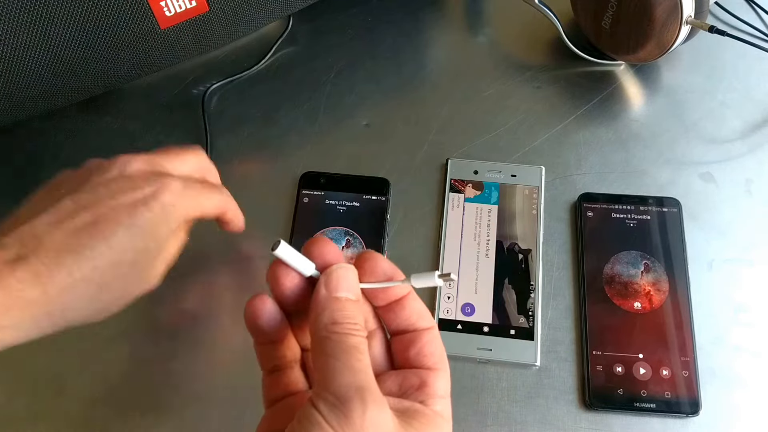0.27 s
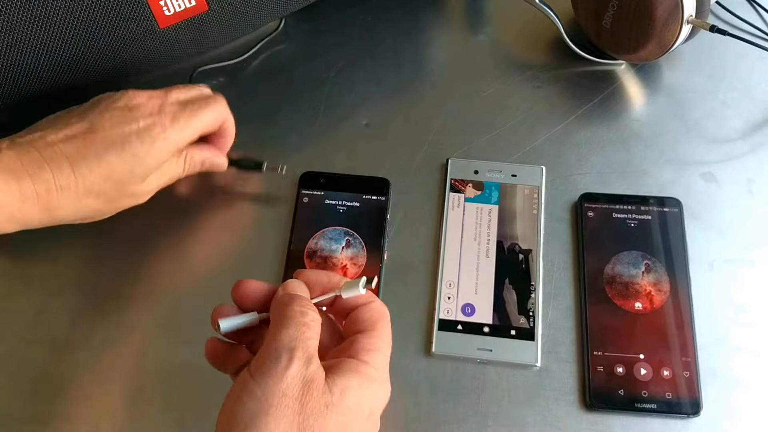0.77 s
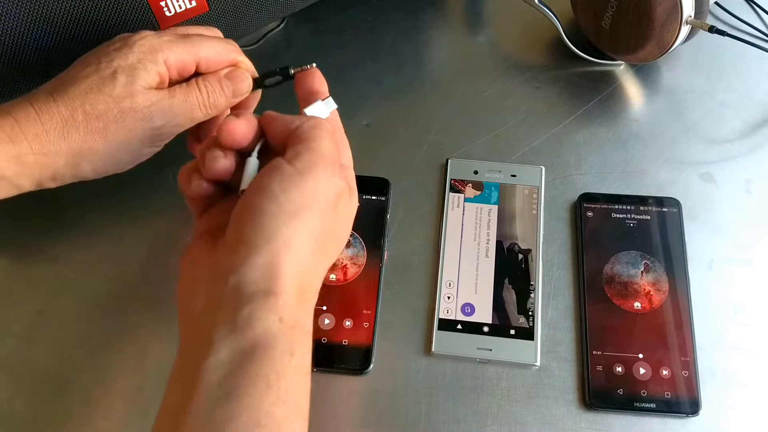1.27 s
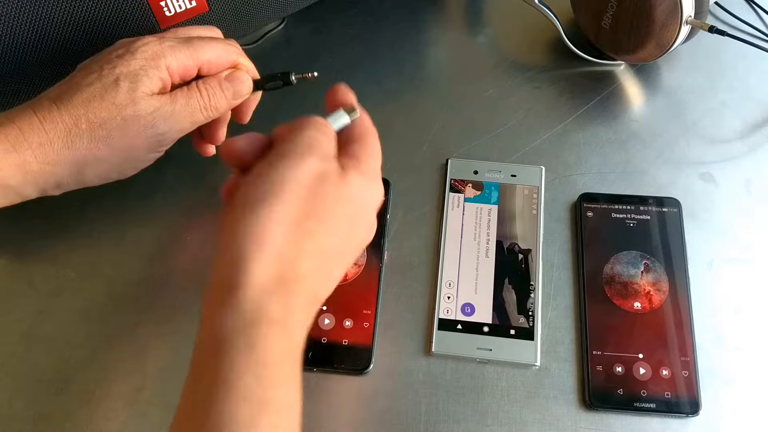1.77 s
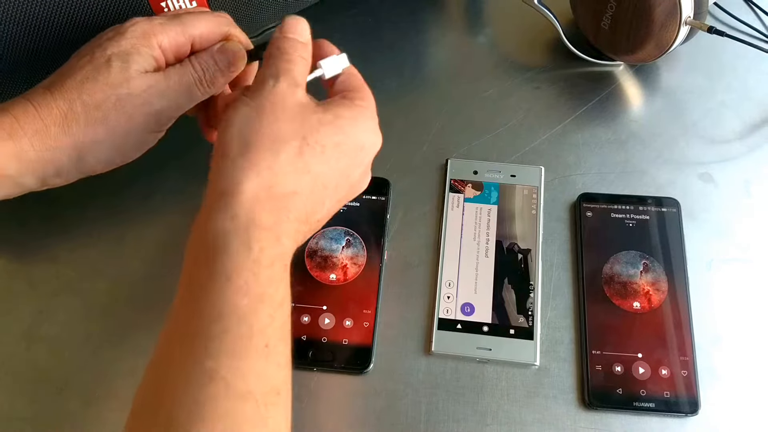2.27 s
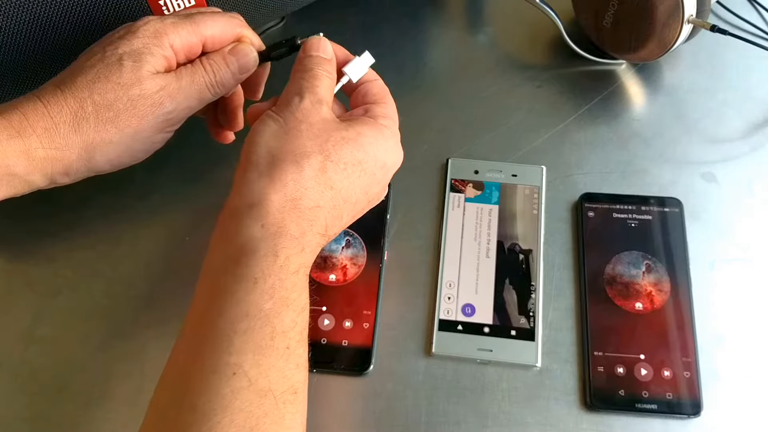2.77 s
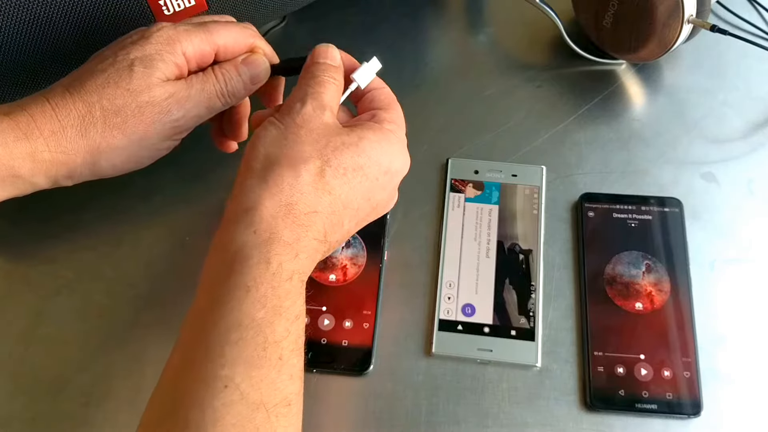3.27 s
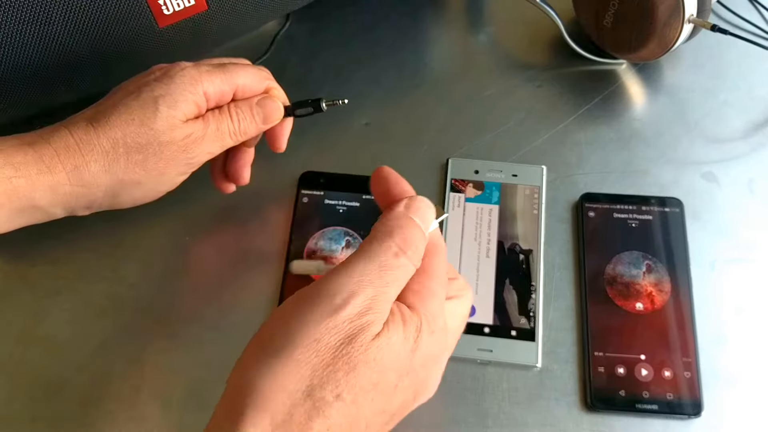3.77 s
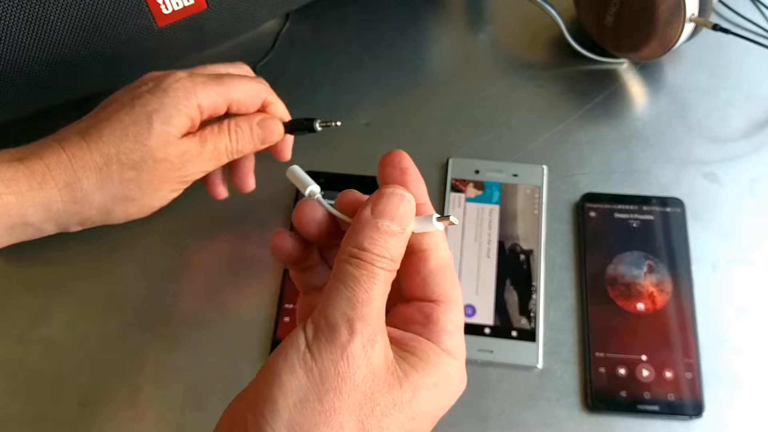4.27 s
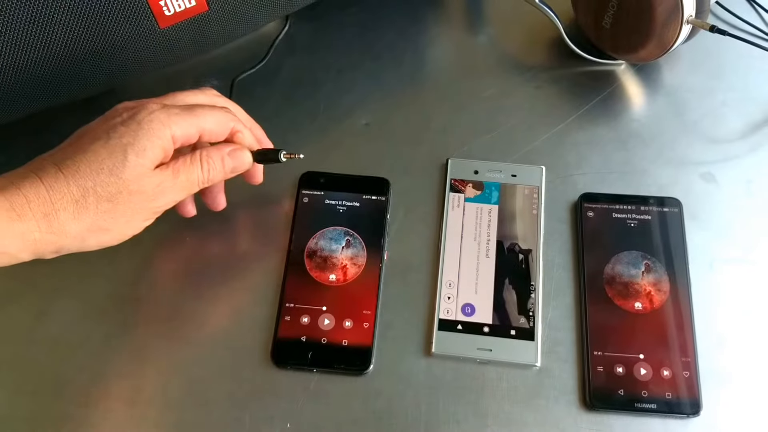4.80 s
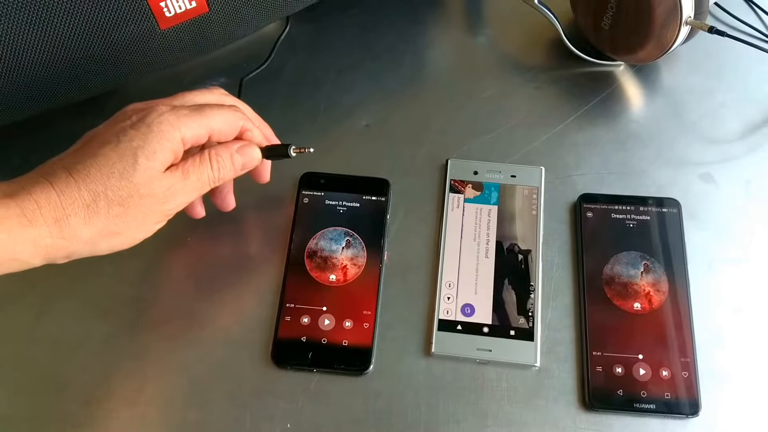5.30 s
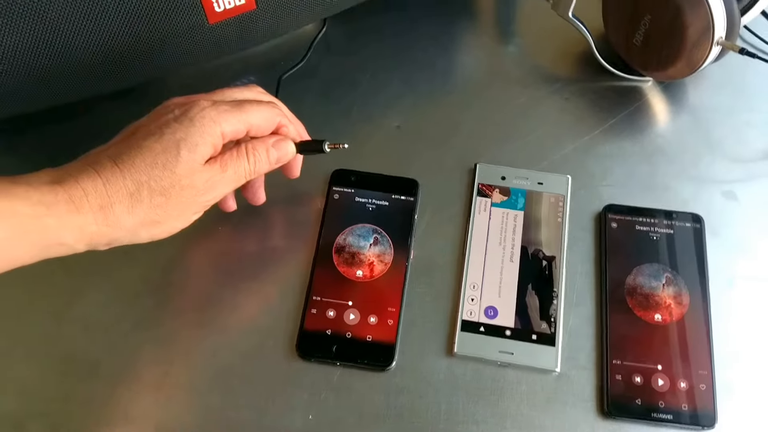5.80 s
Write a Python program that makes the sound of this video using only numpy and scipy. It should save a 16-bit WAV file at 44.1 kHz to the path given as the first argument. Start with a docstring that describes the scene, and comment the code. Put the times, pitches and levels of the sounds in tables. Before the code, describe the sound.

A plug snaps out of a phone, then a loudspeaker pops, buzzes and booms as the live plug is touched, followed by light clicks.

```python
"""A loudspeaker on a table pops, buzzes and booms as its live jack plug is tried in a small adapter.
First the plug scrapes and snaps out of a phone. Then the speaker pops as the plug makes contact, and
while the tip is touched, mains hum makes it buzz and sizzle, with a bass boom that rings on.
Last, the adapter is put down with a few light clicks and a faint metallic ring.
Two close microphones hear it all in a small room with a low rumble."""
import sys
import numpy as np
from scipy import signal
from scipy.fft import rfft, irfft, next_fast_len
from scipy.io import wavfile
from scipy.ndimage import uniform_filter1d

SR = 44100
rng = np.random.default_rng(int(sys.argv[2]) if len(sys.argv) > 2 else 0)


def unload_wav(signal):
    """Save mono or channel-first audio to the path in sys.argv[1] as 16-bit WAV at rate SR, clipped to [-1, 1]."""
    wavfile.write(
        sys.argv[1],
        SR,
        np.round(np.clip(np.atleast_2d(signal).T, -1, 1) * 32767).astype(np.int16),
    )


N = 266540
T = np.arange(N) / SR
BINS = np.fft.rfftfreq(8192, 1 / SR)  # the frequencies at which filters are drawn [Hz]
MAINS_HZ, MAINS_PHASE_S = 50.03, .0121


def amp(db):
    """Turns decibels into a gain."""
    return 10 ** (np.asarray(db) / 20)


def unit(x):
    """Scales a sound to an average (rms) level of 1."""
    return x / np.sqrt(np.mean(x ** 2) + 1e-20)


def read(points, hz=BINS):
    """Joins a table's points into a curve over log frequency."""
    f, value = np.transpose(points)
    return np.interp(np.log(hz + 1), np.log(f + 1), value)


def add(mix, start_s, sound):
    """Mixes a sound in at the given time."""
    part = mix[:, max(round(start_s * SR), 0):][:, :sound.shape[1]]
    part += sound[:, :part.shape[1]]


def sides(db):
    """Left and right gains; positive dB leans left."""
    return amp(np.array([[1], [-1]]) * db / 2)


def placed(sound, pan_db, room_db):
    """Sets the side of a sound and how much of it reaches the room."""
    return sound * np.vstack([sides(pan_db), [[amp(room_db)]]])


def colour(x, db):
    """Filters by a dB curve at BINS; nothing rings before the sound starts."""
    log_gain = np.log(amp(np.concatenate([db, db[-2:0:-1]])))
    taps = np.fft.ifft(np.exp(np.conj(signal.hilbert(log_gain)))).real[:len(BINS)]
    return signal.oaconvolve(np.atleast_2d(x), taps[None], axes=1)[:, :x.shape[-1]]


def shape(x, gain):
    """Filters by a gain curve at BINS; only a complex gain shifts the phase."""
    size = next_fast_len(N)
    hz = np.fft.rfftfreq(size, 1 / SR)
    curves = np.array([np.interp(hz, BINS, g) for g in np.atleast_2d(gain)])
    return irfft(rfft(x, size) * curves, size)[:, :N]


def resonate(x, hz, width_hz):
    """Two like resonances in a row: the narrower, the longer they ring."""
    r = np.exp(-np.pi * width_hz / SR)
    for _ in range(2):
        x = 2 * signal.lfilter([1 - r], [1, -r * np.exp(2j * np.pi * hz / SR)], x + 1e-18).real
    return x


def crack(db, scatter, decay_s, rise_s, scatter_hz=1000):
    """A click whose treble partly scatters into a spray of noise. Rows: left, right, into the room."""
    t = T[:len(BINS)]
    click = 1. * (t == 0)
    spray = rng.standard_normal((2, len(t))) * np.exp(-t / decay_s) * (1 - np.exp(-t / rise_s))
    spray /= np.linalg.norm(spray, axis=1, keepdims=True)
    share = scatter / (1 + (scatter_hz / (BINS + 10)) ** 2)
    direct = colour(click, db + 10 * np.log10(1 - share)) + colour(spray, db + 10 * np.log10(share))
    # summed over all directions, the treble peaks even out
    all_round = db + (uniform_filter1d(db, size=300) - db) * BINS ** 4 / (BINS ** 4 + 2000 ** 4)
    return np.vstack([direct, colour(click, all_round)])


def pickup_db(rise_db=26, fade_db_per_s=4, start_s=1.7, rise_s=0.36):
    """Hum on the bare plug swells to 0 dB as it is held to the adapter, then slowly fades."""
    since = T - start_s
    return rise_db * (np.clip(since / rise_s, 0, 1) - 1) - fade_db_per_s * np.maximum(since - rise_s, 0)


# tone of the rumble and hiss: (frequency [Hz], relative level [dB])
NOISE_TONE = [(15, -53), (25, -22.5), (38, -4), (59, -7), (157, -23), (301, -23), (405, -28.5),
              (503, -28.5), (1230, -34.5), (1330, -36.5), (1560, -37.5), (5880, -49), (13600, -42),
              (16000, -49)]
# how alike that noise is in both microphones: (frequency [Hz], likeness [0 to 1])
NOISE_LIKENESS = [(50, 0.5), (200, 0.47), (600, 0.37), (1500, 0), (15000, 0)]
# which way the background leans: (frequency [Hz], left minus right [dB])
BACKGROUND_PAN = [(55, -7.5), (120, -8), (250, 0), (15000, -0.5)]
# low tones that hang in the room: (frequency [Hz], relative level [dB])
LOW_TONES = [(48.4, -54), (70.0, -62), (102.3, -65), (150.7, -68.5), (199.2, -68.5), (247.6, -69.5)]
def background(noise_db=-54.5, hum_db=-1, waver=0.13, waver_hz=3):
    """Room rumble and microphone hiss, plus low wavering tones that weakly follow the plug's hum."""
    left, other = rng.standard_normal((2, N))
    same, balance = read(NOISE_LIKENESS), sides(read(BACKGROUND_PAN))
    right = shape(left, same) + shape(other, np.sqrt(1 - same ** 2))
    hiss = amp(noise_db) * unit(shape(np.vstack([left, right]), amp(read(NOISE_TONE)) * balance))
    hum = np.zeros(N)
    for hz, db in LOW_TONES:
        drift = unit(resonate(rng.standard_normal(N), hz, waver_hz))
        hum += amp(db) * (np.sqrt(2) * np.sin(2 * np.pi * hz * T) + waver * drift)
    swell = amp(hum_db + pickup_db(rise_db=18, fade_db_per_s=0.64))
    return hiss + shape(hum * swell, balance)


# tone of the plug sliding in the socket: (frequency [Hz], relative level [dB])
SLIDE_TONE = [(60, -18), (400, 12), (1000, -5), (2200, -5), (3300, -3.5), (5000, 1), (9000, 1.5),
              (12500, -1), (16000, -13)]
# tone of the plug snapping free: (frequency [Hz], relative level [dB])
SNAP_TONE = [(40, -23), (90, 5), (180, 17), (400, 11), (720, 2), (1400, 0), (2400, -4), (2850, 0),
             (3300, -10.5), (5000, -8), (8000, -6.5), (11600, -2.5), (16000, -20)]
def unplug(snap_s=.0642, snap_db=7, slide_db=-52):
    """The plug scrapes out of the phone's socket and comes free with a snap."""
    out = np.zeros((3, N))
    scrape = colour(rng.standard_normal((3, N))[:, :round(snap_s * SR)], read(SLIDE_TONE))
    add(out, 0, amp(slide_db) * unit(scrape))
    snap = crack(snap_db + read(SNAP_TONE), scatter=0.63, decay_s=0.0013, rise_s=0.0018)
    add(out, snap_s, placed(snap, pan_db=4.3, room_db=1))
    return out


# taps on plug and adapter:
# (time [s], relative level [dB], pitch [Hz], width [octaves], decay [s], left minus right [dB])
TAPS = [(.401, -24.5, 7900, 1, 0.0013, 0), (.402, -3, 144, 1.08, 0.02, -2.5),
        (0.41, -29, 5500, 5.7, 0.0064, 4), (0.606, -20, 1900, 0.9, 0.0078, -2),
        (0.647, -16, 334, 0.58, 0.0026, -1), (4.97, -6, 156, 0.66, 0.015, 0),
        (4.9798, -14, 3600, 0.82, 0.0033, -11), (5.0002, -19, 3540, 0.71, 0.0018, -23),
        (5.004, -21.5, 2900, 1.09, 0.004, 15), (5.174, -20.5, 4000, 0.55, 0.0014, -8),
        (5.286, -29.5, 1820, 0.73, 0.012, 0), (5.557, -23.5, 1910, 0.62, 0.012, -3)]
# resonances of their small parts: (frequency [Hz], width [Hz], boost [dB])
PART_RESONANCES = [(930, 970, 15.5), (3030, 92, 9.5), (4060, 470, 7), (7600, 230, 11)]
def taps(skirt_db=-26, room_db=-1):
    """Handled plastic and metal parts click and scrape, and die away at once."""
    out = np.zeros((3, N))
    body_db = sum(db / (1 + (2 * (BINS - hz) / width) ** 2) for hz, width, db in PART_RESONANCES)
    for start_s, db, hz, octaves, decay_s, pan_db in TAPS:
        band = np.exp(-.5 * (np.log2((BINS + 1) / hz) / octaves) ** 2)
        skirt = amp(skirt_db) / (1 + BINS / hz)  # weak sound outside the band
        tone_db = db + body_db + 20 * np.log10(band + skirt)
        tap = crack(tone_db, scatter=.99, decay_s=decay_s, rise_s=0.00041, scatter_hz=208)
        add(out, start_s, placed(tap, pan_db, room_db))
    return out


def whine(start_s=1.1, end_s=1.6, fade_s=.06, hz=1210, width_hz=70, level_db=-74):
    """A narrow band of noise makes a faint, fuzzy tone in the background."""
    gate = np.clip(np.minimum(T - start_s, end_s - T) / fade_s, 0, 1)
    return amp(level_db) * gate * unit(resonate(rng.standard_normal((2, N)), hz, width_hz))


# touches of the plug's tip: (time [s], length [s], buzz [dB], sizzle [dB], bass drive [dB],
# delay to firmest contact [s], half-length of the dip there [s], depth of the dip [dB])
TIP_TOUCHES = [(1.672, 0.06, -32, -47, -25, 0, .013, 12.5), (2.317, 0.19, -26, -45.5, -22.5, .1, 0.047, 7),
               (2.65, 0.14, -27.5, -42, -20, 0.09, 0.016, 10.5),
               (2.955, .151, -27, -43.5, -21, .085, 0.012, 14.5),
               (3.18, 0.15, -33, -57.5, -25, 0.055, 0.013, 12)]
def touch_gain(layer, edge_s):
    """Each touch turns a layer on; it dips while contact is firm and drifts as the plug works loose."""
    gain = np.zeros(N)
    for start_s, length_s, buzz_db, sizzle_db, bass_db, firm_s, half_s, dip_db in TIP_TOUCHES:
        t = T - start_s
        gate = np.clip(np.minimum(t, length_s - t) / edge_s + .5, 0, 1)
        dip = dip_db * np.exp(-.5 * ((t - firm_s) / half_s) ** 2)
        loose = np.clip(t / length_s, 0, 1) - .5
        db = {"buzz": buzz_db - dip - .5 * loose,
              "sizzle": sizzle_db - dip + 3 * loose,
              "bass": bass_db - .05 * dip}
        gain += gate * amp(db[layer])
    return gain


# harmonics of the buzz: (multiple of the mains frequency, relative level [dB])
BUZZ_HARMONICS = [(1, 0), (2, -0.5), (3, -9), (4, -9.5), (5, -4), (6, -2), (7, -6), (8, -7.5), (9, -9.5),
                  (10, -12.5), (11, -18), (12, -18), (13, -46.5), (14, -31.5), (15, -26), (16, -20.5),
                  (17, -35.5), (18, -45.5)]
# its weak treble: (frequency [Hz], relative level [dB])
BUZZ_TREBLE = [(1150, -29), (1300, -39), (1500, -28), (2200, -48.5), (3600, -38.5), (6000, -53.5)]
def buzz(untouched_db=-57, flutter=0.052, lowest_db=-16):
    """One blunt spike each mains cycle kicks the speaker cone, which rings near 300 Hz."""
    spikes = np.diff(np.floor((T - MAINS_PHASE_S) * MAINS_HZ), prepend=-1)
    bass = [(MAINS_HZ / 2, -40), (MAINS_HZ, lowest_db)]  # sets the first harmonic
    overtones = [(k * MAINS_HZ, db) for k, db in BUZZ_HARMONICS[1:]]
    tone_db = read(bass + overtones + BUZZ_TREBLE) - 10 * np.log10(1 + (BINS / 4000) ** 6)
    strength = touch_gain("buzz", edge_s=.003) + amp(untouched_db + pickup_db())
    strength *= 1 + flutter * rng.standard_normal(N)
    return colour(spikes * strength, tone_db) / colour(spikes, tone_db).std()


# tone of the sizzle's bright fizz: (frequency [Hz], relative level [dB])
FIZZ_TONE = [(200, -25), (800, -1.5), (2800, -0.5), (3800, 2.5), (5800, -3.5), (10300, -1), (13000, -1),
             (14500, -8.5), (16000, -26.5)]
# tone of its lower rasp: (frequency [Hz], relative level [dB])
RASP_TONE = [(300, -19), (600, -4), (820, 7), (1000, -4.5), (1500, 0), (2100, -5), (3000, -7),
             (5000, -17.5), (16000, -49.5)]
def sizzle(untouched_db=-72, rasp_db=-20, burst_s=.0013, lag_s=0.00025, uneven_db=1.5,
           between=0.32, repeat=0.56, same=0.65):
    """Noise from the power supply bursts on both crests of each mains cycle."""
    crests = (T - MAINS_PHASE_S - lag_s) * 2 * MAINS_HZ
    nearest = np.round(crests).astype(int)
    bursts = between + np.exp(-.5 * ((crests - nearest) / (2 * MAINS_HZ) / burst_s) ** 2)
    bursts *= amp(uneven_db * rng.standard_normal(nearest.max() + 2))[nearest]
    # part of the noise repeats every cycle, and part is the same on both sides
    fresh = rng.standard_normal((3, N))
    looped = fresh[:, np.arange(N) % round(SR / MAINS_HZ)]
    noise = np.sqrt(1 - repeat) * fresh + np.sqrt(repeat) * looped
    noise = bursts * (np.sqrt(same) * noise[2] + np.sqrt(1 - same) * noise[:2])
    strength = touch_gain("sizzle", edge_s=0.0012) + amp(untouched_db + pickup_db())
    fizz = unit(colour(noise, read(FIZZ_TONE))) * strength
    rasp = unit(colour(noise, read(RASP_TONE))) * amp(rasp_db) * touch_gain("buzz", edge_s=.003)
    return fizz + rasp


# low resonances of speaker and room:
# (frequency [Hz], width [Hz], gain [dB], multiple of the mains frequency that feeds it)
BASS_RESONANCES = [(53, 9.7, -4, 1), (69.7, 4.9, -2, 1), (96.6, 20, -13, 2), (139.3, 29, -14.5, 3)]
def boom(drive_db=1):
    """The lowest mains harmonics feed low resonances, which swell late and ring on."""
    phase = 2 * np.pi * MAINS_HZ * (T - MAINS_PHASE_S)
    drive = np.sqrt(2) * amp(drive_db) * touch_gain("bass", edge_s=.005)
    return sum(amp(db) * resonate(drive * np.sin(k * phase), hz, width)
               for hz, width, db, k in BASS_RESONANCES)


# tone of a speaker pop: (frequency [Hz], relative level [dB])
POP_TONE = [(40, -15), (120, 10), (350, 12.5), (700, -1.5), (1450, -2), (2200, -3.5), (3150, -6), (3600, 5),
            (4300, -6), (6100, -10.5), (7300, -8), (10500, -5.5), (13000, -11.5), (16000, -23.5)]
# pops as the tip touches:
# (time [s], relative level [dB], bass boost [dB], treble boost [dB], left minus right [dB], room [dB])
CONTACT_POPS = [(2.3132, 3.5, 2.5, 12.5, -1, -0.5), (2.6499, 16, -0.5, -1.5, 8, -1.5),
                (2.9482, 0.5, -8.5, -9.5, 4, -1.5), (3.1823, -7.5, 4, 13, -1, -1)]
def pops(scatter=.75, bounce=0.33, bounce_s=0.0019):
    """A jump in voltage pops the speaker; the table throws the sound back a moment later."""
    out = np.zeros((3, N))
    bass, treble = 1 / (1 + (BINS / 600) ** 2), 1 / (1 + (6000 / (BINS + 1)) ** 3)
    for start_s, db, bass_db, treble_db, pan_db, room_db in CONTACT_POPS:
        tone_db = db + read(POP_TONE) + bass_db * bass + treble_db * treble
        pop = crack(tone_db, scatter, decay_s=0.00032, rise_s=.0001)
        add(out, start_s, placed(pop, pan_db, room_db))
        echo = crack(tone_db, scatter, decay_s=0.0013, rise_s=.0002)
        add(out[:2], start_s + bounce_s, bounce * echo[:2])
    return out


# ringing tones of the metal: (frequency [Hz], relative level [dB], time to fade by 60 dB [s])
METAL_TONES = [(1440, 9, 1.1), (3801, -9, 0.52), (4000, -9, 0.61), (5599, -8, 0.43), (7698, -13, 0.58)]
def metal_ring(start_s=4.981, level_db=-74, pan_db=-3):
    """The adapter lands on the steel table and rings faintly."""
    out, t = np.zeros((2, N)), T[:SR]
    tones = sum(amp(db - 60 * t / fade_s) * np.sin(2 * np.pi * hz * t) for hz, db, fade_s in METAL_TONES)
    add(out, start_s, amp(level_db) * sides(pan_db) * tones)
    return out


# how long the room echoes: (frequency [Hz], time to fade by 60 dB [s])
ECHO_FADE = [(100, 1.13), (300, 0.48), (800, 0.9), (2000, 0.74), (5000, .5), (12000, 0.47)]
# how loud it echoes: (frequency [Hz], level [dB])
ECHO_LEVEL = [(60, -9.5), (300, -4), (800, -1.5), (2500, -5), (5000, -3.5), (10000, -12), (15000, -8)]
def room(x, first_s=0.0013, bass_hz=450):
    """Dense reflections, each band dying at its own speed; the bass reaches both microphones alike."""
    echoes = rng.standard_normal((2, SR)) * (rng.random((2, SR)) < .25) * (T[:SR] > first_s)
    hz, t, bands = signal.stft(echoes, SR, nperseg=256)
    same = 1 / (1 + (hz[:, None] / bass_hz) ** 4)
    bands[1] = same * bands[0] + np.sqrt(1 - same ** 2) * bands[1]
    fade_s = read(ECHO_FADE, hz)[:, None]
    bands *= amp(read(ECHO_LEVEL, hz)[:, None] - 60 * t / fade_s)
    bands *= np.sqrt(2 * np.log(1000) / (fade_s * SR))  # a longer fade adds no energy
    tail = signal.istft(bands, SR, nperseg=256)[1] / echoes.std()
    return signal.fftconvolve(x[None], tail, axes=1)[:, :N]


# which way the speaker's hum leans: (frequency [Hz], left minus right [dB])
HUM_PAN = [(60, -8.5), (110, -14.5), (200, 4), (380, 3), (700, -5), (1300, 9), (2400, -0.5), (8000, 0),
           (15000, 10.5)]
# the nearer, left microphone hears the speaker first: (frequency [Hz], phase lead [radians])
LEFT_LEAD = [(50, 1.5), (150, 1.5), (300, 0.44), (650, 1.2), (1150, 1.6), (2300, 2.15), (3700, 4.8),
             (5000, 4.8), (10000, 19), (15000, 1.6)]
def scene(hum_room_db=-3, tweeter_hz=13600):
    """Speaker, phone and hands each sound from their own place in the room."""
    balance = sides(read(HUM_PAN))
    lead = np.exp(.5j * np.array([[1], [-1]]) * read(LEFT_LEAD))
    treble_limit = 1 / np.sqrt(1 + (BINS / tweeter_hz) ** 16)
    hum = shape(buzz() + sizzle(), treble_limit)
    cracks = shape(pops(), treble_limit)
    handling = unplug() + taps()
    speaker = shape(hum + boom(), balance * lead) + shape(cracks[:2], lead)
    echoes = room(amp(hum_room_db) * hum.mean(0) + cracks[2]) + room(handling[2])
    return speaker + handling[:2] + echoes + background() + metal_ring() + whine()


def record(dry, ceiling=0.92, low_cut_hz=42, high_cut_hz=16100):
    """The microphones lose the deepest bass, loud cracks overload softly, and the top treble is cut."""
    dry = shape(dry, 1 / np.sqrt(1 + (low_cut_hz / (BINS + 1)) ** 24))
    limited = ceiling * np.tanh(dry / ceiling)
    high_cut = signal.firwin(511, high_cut_hz, window=("kaiser", 9), fs=SR)
    return signal.oaconvolve(limited, high_cut[None], "same")


dry = scene()
out = record(dry)
unload_wav(out)
```